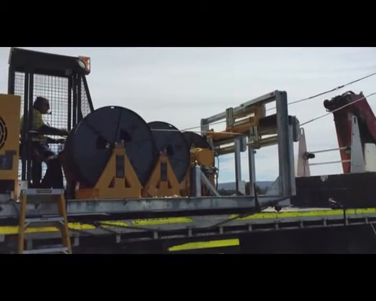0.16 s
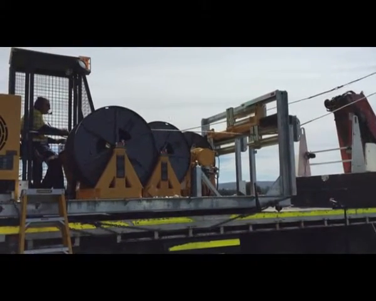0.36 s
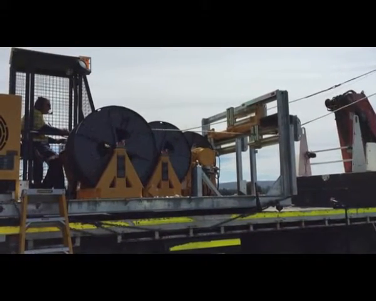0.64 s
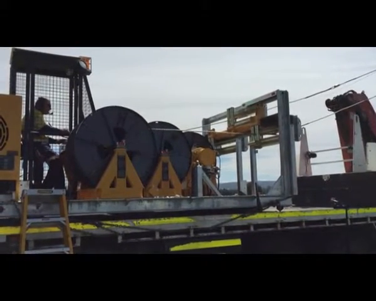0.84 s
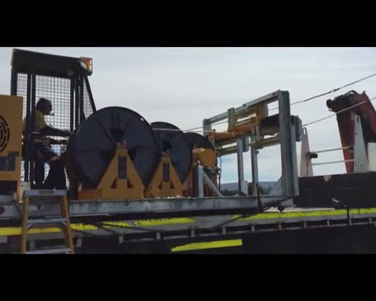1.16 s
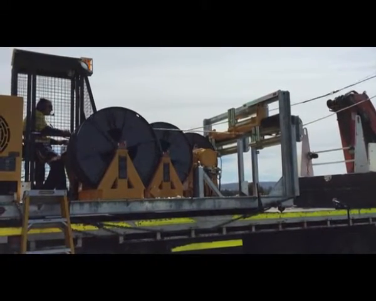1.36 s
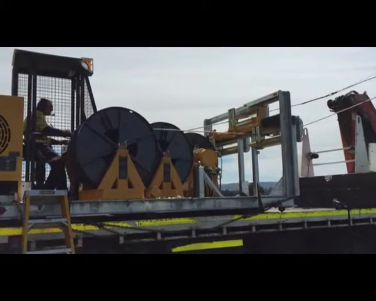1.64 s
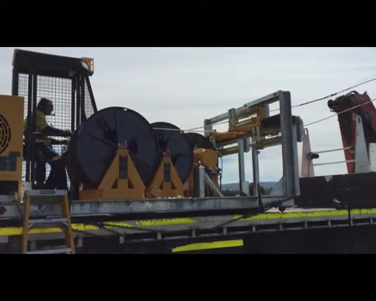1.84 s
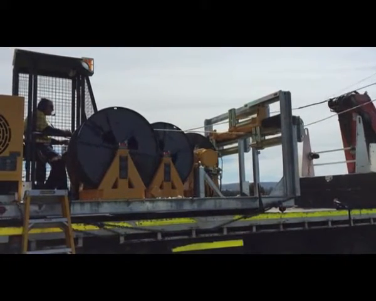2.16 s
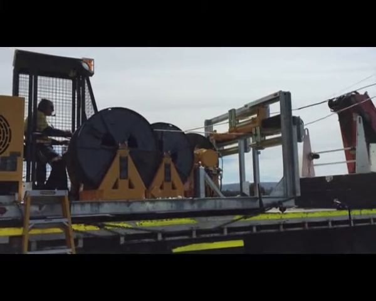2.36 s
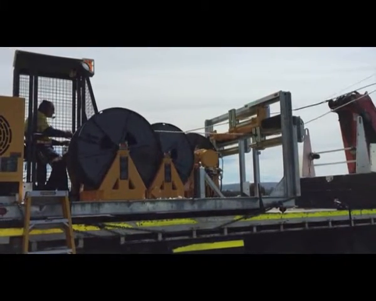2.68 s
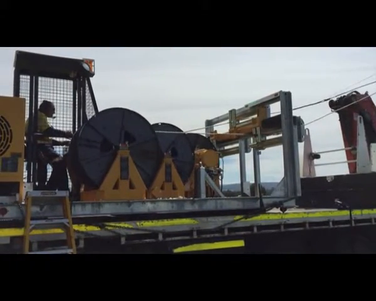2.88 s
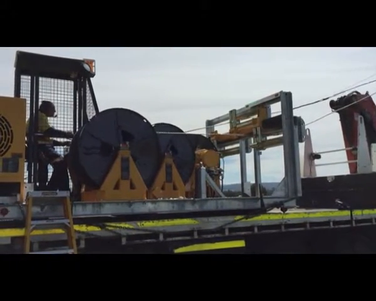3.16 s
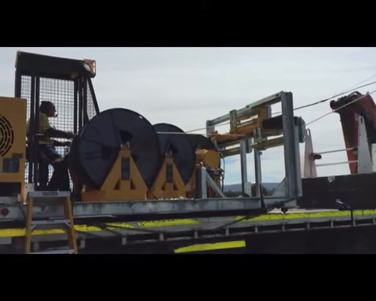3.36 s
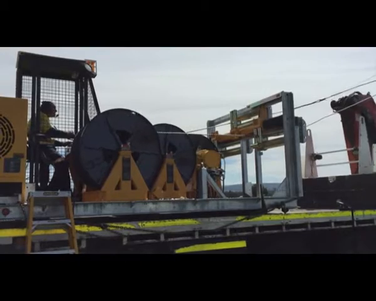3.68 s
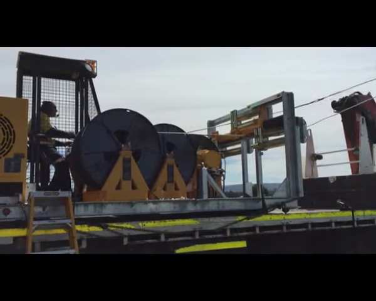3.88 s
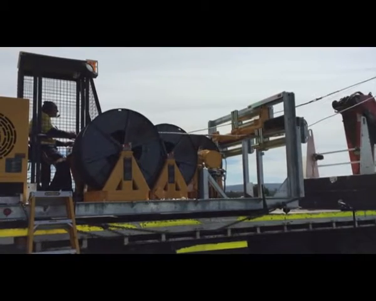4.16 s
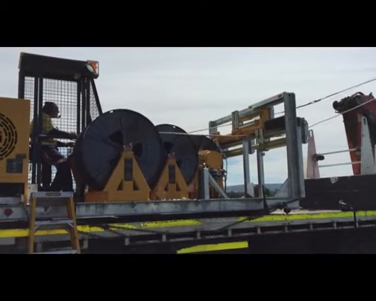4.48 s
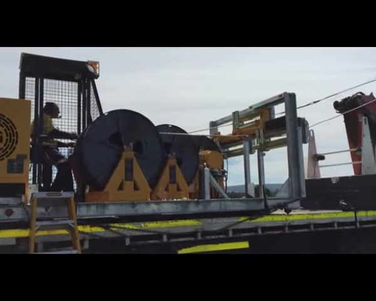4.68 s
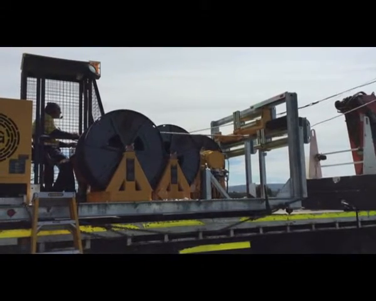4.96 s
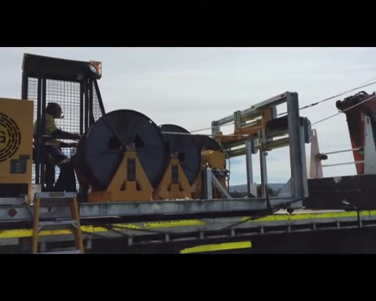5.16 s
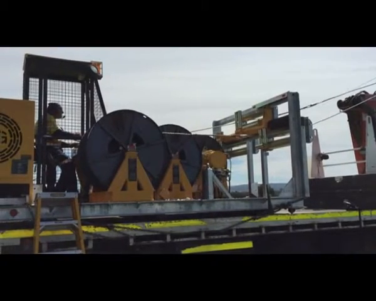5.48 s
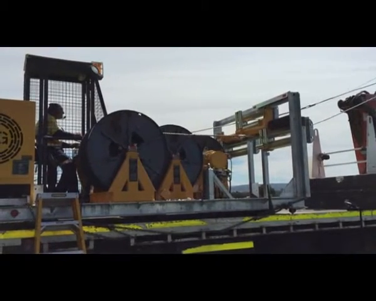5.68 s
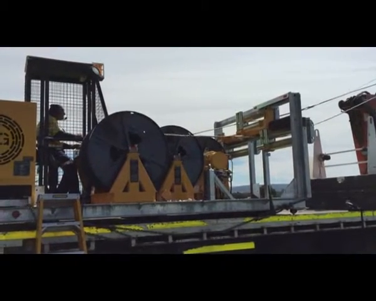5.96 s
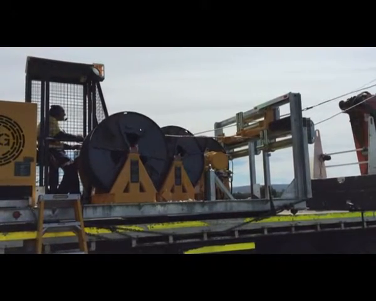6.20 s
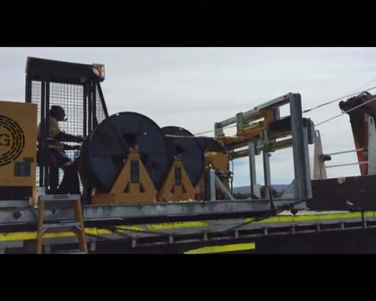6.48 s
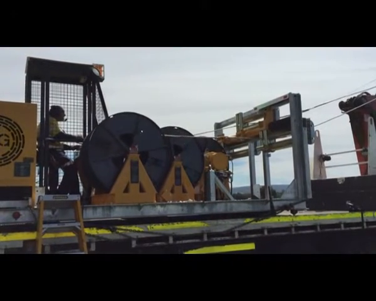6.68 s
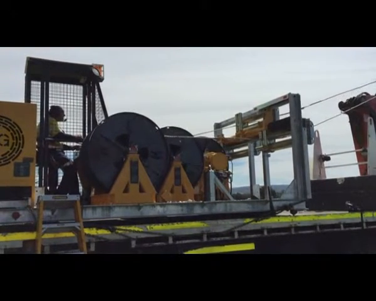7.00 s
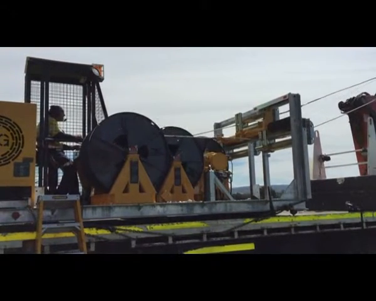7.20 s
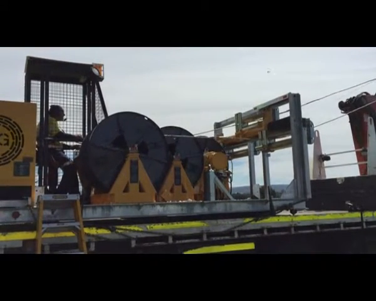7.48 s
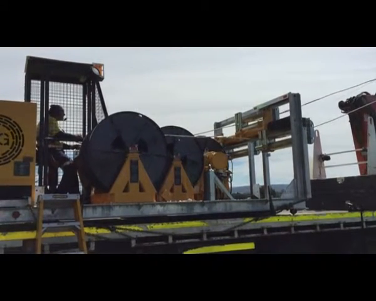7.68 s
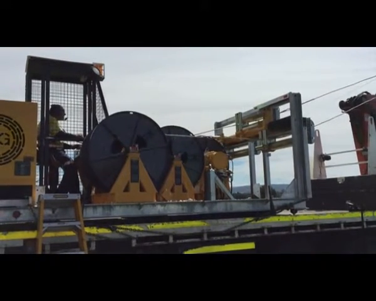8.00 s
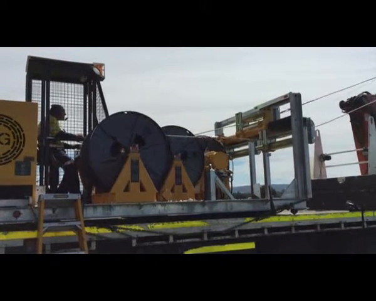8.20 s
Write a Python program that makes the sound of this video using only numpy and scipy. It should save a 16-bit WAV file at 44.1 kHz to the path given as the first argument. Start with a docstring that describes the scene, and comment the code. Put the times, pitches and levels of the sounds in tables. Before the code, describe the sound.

Steady diesel-driven cable winch on an open deck: low drone, metallic rattle, pump whine and oil hiss, with low wind thumps early on.

```python
"""A four-cylinder diesel drives the hydraulic pump of a cable winch on an open truck deck, at nearly steady speed.
Exhaust harmonics drone, each firing strikes the block's modes, and loose parts clatter as modulated resonances.
The nine-piston pump whines in tones locked to the crank; oil hisses as broad noise and narrow bands that surge.
A short faint groan, perhaps the cable in its sheave, is a rising tone. Wind is low noise with decaying thumps:
puffs on the microphone at the start and a light rumble near the end."""
import sys
import numpy as np
from scipy import signal
from scipy.fft import rfft, irfft
from scipy.io import wavfile

SR = 44100
rng = np.random.default_rng(int(sys.argv[2]) if len(sys.argv) > 2 else 0)


def put_to_file(sound):
    """Save the sound as 16-bit audio at rate SR, in the file named by the first command-line argument."""
    columns = np.atleast_2d(sound).T  # one column per channel
    safe = np.clip(columns, -1, 1)
    whole_steps = np.round(safe * 32767)
    wavfile.write(sys.argv[1], SR, whole_steps.astype(np.int16))


N = 367794
TIME = np.arange(N) / SR   # s


def from_db(db):
    """Logarithmic level: decibels to amplitude gain."""
    return 10 ** (np.asarray(db) / 20)


def rms_one(x):
    """Normalisation: scale to unit mean power."""
    return x / np.sqrt(np.mean(x ** 2) + 1e-20)


def in_time(rows):
    """Linear interpolation: each column of a curve at every sample."""
    seconds, *columns = np.transpose(rows)
    return [np.interp(TIME, seconds, column) for column in columns]


def envelope(start, hold, attack, release):
    """Linear growth toward 1; exponential decay sets in once the hold, counted from the start, is over."""
    age = TIME - start
    rise = np.clip(age / attack, 0, 1)
    fall = np.exp(-np.maximum(age - hold, 0) / release)
    return rise * fall


def drift(rate):
    """Low-passed random fluctuation: mostly slower than the rate in Hz, with unit rms."""
    hz = np.arange(N // 2 + 1) * SR / N
    lowpass = 1 / (1 + (hz / rate) ** 4)
    return rms_one(irfft(rfft(rng.standard_normal(N)) * lowpass, N))


def noise(spectrum):
    """Spectral shaping: noise of the given dB per Hz, falling steeply beyond both ends."""
    hz = np.maximum(np.arange(N // 2 + 1) * SR / N, 1)
    points, db = np.transpose(spectrum)
    skirts = np.minimum(1, np.minimum(hz / points[0], points[-1] / hz)) ** 12
    gain = from_db(np.interp(np.log(hz), np.log(points), db)) * skirts
    return irfft(rfft(rng.standard_normal(N)) * gain, N) * np.sqrt(SR / 2)


def ring(force, hz, width):
    """Double resonance: the envelope of a unit click's response swells to height 1 and dies away."""
    damping = np.pi * width / SR
    pole = np.exp(-damping + 2j * np.pi * hz / SR)
    response = signal.lfilter([1], [1, -2 * pole, pole ** 2], force + 1e-18)
    return np.e * damping * response.real


def narrow_noise(bands):
    """Random excitation of resonances: noise rings in each band at its own rms level."""
    return sum(from_db(db) * rms_one(ring(rng.standard_normal(N), hz, width))
               for hz, width, db in bands)


def clicks(times, sizes):
    """Impulsive excitation: single-sample blows at the given seconds."""
    samples = np.clip(np.round(times * SR).astype(int), 0, N - 1)
    return np.bincount(samples, sizes, N)


# engine speed: [t/s, crank speed/(r/min)]
ENGINE_SPEED = [(0, 1778), (0.7, 1772), (1.3, 1774), (1.7, 1775.5), (2.2, 1774), (3.1, 1774), (3.8, 1772.2),
                (4.7, 1772.2), (5.3, 1774.8), (5.9, 1772.6), (6.6, 1770.5), (7.2, 1774.5), (7.8, 1770.6),
                (8.34, 1779)]


def engine_cycles():
    """Phase as the integral of speed: a four-stroke cycle takes two revolutions."""
    rpm, = in_time(ENGINE_SPEED)
    return .01 + np.cumsum(rpm / 120) / SR


# exhaust harmonics: [multiple of the cycle rate, level before waver/dB rms]
EXHAUST_HARMONICS = [(4, -31), (8, -50.5), (12, -50), (13, -52.5), (16, -65), (17, -54), (21, -67),
                     (24, -53.5), (38, -60), (42, -57.5), (44, -51.5)]


def exhaust(cycles, waver_db):
    """Fourier synthesis: the silencer leaves a strong firing tone and weak overtones."""
    crest = cycles - .078   # all harmonics crest together at this share of the cycle
    out = np.zeros(N)
    for multiple, db in EXHAUST_HARMONICS:
        level = from_db(db + waver_db * drift(11.0))
        out += np.sqrt(2) * level * np.cos(2 * np.pi * multiple * crest)
    return out


# when each cylinder knocks: [share of the two-revolution cycle]
KNOCK_PHASES = [.0277, .2906, .5328, .7459]
# modes of block and covers: [f/Hz, width/Hz, nominal peak level/dB for cylinders 1, 2, 3, 4]
BLOCK_MODES = [(985.0, 109.0, -47.0, -35.0, -54.0, -54.0), (1058.0, 32.0, -40.0, -46.0, -41.0, -38.0),
               (1178.0, 42.0, -33.0, -42.0, -50.0, -54.0), (1208.0, 20.0, -33.0, -39.0, -39.0, -43.0),
               (1249.0, 42.0, -36.0, -54.0, -38.0, -54.0), (1315.0, 58.0, -51.0, -54.0, -43.0, -33.0),
               (1469.0, 62.0, -31.0, -54.0, -38.0, -27.0), (1509.0, 37.0, -37.0, -54.0, -31.0, -54.0),
               (1557.0, 29.0, -42.0, -47.0, -33.0, -38.0), (1725.0, 20.0, -52.0, -40.0, -54.0, -54.0),
               (1804.0, 57.0, -44.0, -33.0, -33.0, -33.0), (1845.0, 46.0, -54.0, -33.0, -42.0, -51.0),
               (2055.0, 110.0, -40.0, -37.0, -43.0, -33.0), (2104.0, 25.0, -40.0, -36.0, -37.0, -45.0),
               (2667.0, 94.0, -36.0, -54.0, -50.0, -42.0), (2778.0, 55.0, -54.0, -44.0, -38.0, -41.0),
               (2828.0, 86.0, -51.0, -45.0, -37.0, -54.0)]
# overall gain of the knock: [t/s, gain/dB]
KNOCK_GAIN = [(0, -1.2), (3.2, -1.1), (4.0, 0.1), (7.5, 0.06), (8.34, -1.2)]


def knock(cycles, jitter_s, uneven_db, mode_uneven_db):
    """Modal excitation: each cylinder strikes the block's modes in its own way, with random strength."""
    due = (np.arange(int(cycles[-1]) + 1)[:, None] + KNOCK_PHASES).ravel()
    due = due[due < cycles[-1]]
    cylinder = np.arange(len(due)) % len(KNOCK_PHASES)
    times = np.interp(due, cycles, TIME) + jitter_s * rng.standard_normal(len(due))
    force_db = uneven_db * rng.standard_normal(len(due))
    out = np.zeros(N)
    for hz, width, *cylinder_db in BLOCK_MODES:
        mode_db = mode_uneven_db * rng.standard_normal(len(due))
        blow_db = np.array(cylinder_db)[cylinder] + force_db + mode_db
        out += ring(clicks(times, from_db(blow_db)), hz, width)
    gain_db, = in_time(KNOCK_GAIN)
    return from_db(gain_db) * out


def shaking(cycles, depth, length, cylinder_db):
    """Periodic amplitude modulation: a brief swell after every firing, at unit mean power."""
    age = (cycles - np.array(KNOCK_PHASES)[:, None]) % 1 / length   # length: share of a cycle
    swells = age * np.exp(1 - age)
    return rms_one(1 + depth * from_db(cylinder_db) @ swells)


# loose clatter of gears and sump: [f/Hz, width/Hz, level/dB rms]
CLATTER_MODES = [(1028, 187, -40.5), (1183, 43, -42.5), (1305, 99, -40.5), (1494.3, 61, -34.5),
                 (1796, 143, -37), (2010, 50, -44), (2164, 300, -44.5)]


def clatter(cycles):
    """Modulated resonant noise: every firing shakes the loose parts."""
    return narrow_noise(CLATTER_MODES) * shaking(cycles, depth=0.34, length=0.11,
                                                 cylinder_db=[2, -14.0, -1.5, -5.5])


# rocker cover resonances: [f/Hz, width/Hz, level/dB rms]
ROCKER_MODES = [(2661, 137, -42.5), (2777, 87, -45), (2853, 22, -49)]


def rocker_buzz(cycles):
    """Modulated resonant noise: the cover buzzes strongly after each firing, .02 cycle late."""
    return narrow_noise(ROCKER_MODES) * shaking(cycles - .02, depth=2.1, length=0.046,
                                                cylinder_db=[-3.5, -11.0, -15, -5.5])


# thin high engine tones: [multiple of the cycle rate, level before waver/dB rms]
ENGINE_TONES = [(79, -45.5), (107, -48.5), (116, -47), (144, -62), (188, -51), (192, -52.5), (195, -55.5)]


def engine_tones(cycles, waver_db):
    """Fourier synthesis: thin high tones at multiples of the cycle rate, locked to the crank."""
    out = np.zeros(N)
    for multiple, db in ENGINE_TONES:
        level = from_db(db + waver_db * drift(2.8))
        out += np.sqrt(2) * level * np.sin(2 * np.pi * multiple * cycles)
    return out


# unsteady hum of the cooling fan: [f/Hz, width/Hz, level/dB rms]
FAN_HUM = [(624.6, 11.5, -49.5)]
# dull noise of fan and frame: [f/Hz, spectral level/dB per Hz]
FRAME_RUMBLE = [(10, -77), (30, -67), (55, -69), (100, -72), (150, -72), (200, -67), (250, -58), (310, -74),
                (390, -77), (460, -71), (530, -59), (580, -69.5), (630, -65), (710, -75), (790, -65.5),
                (850, -79)]


def fan_and_frame():
    """Broadband radiation with one narrow resonance: dull noise and an unsteady fan hum."""
    return noise(FRAME_RUMBLE) + narrow_noise(FAN_HUM)


# pump tones: [multiple of the piston rate, level before swell and waver/dB rms]
PUMP_TONES = [(1, -35.5), (2, -36.5), (3, -51)]
# slow swell of the pump: [t/s, hum gain/dB, overtone gain/dB]
PUMP_SWELL = [(0.0, -1.7, -0.5), (0.6, 1.2, 0.4), (1.95, -0.8, 2.5), (2.25, -1.6, -1.5), (3.3, -2.8, 1),
              (3.75, 0.8, -1.5), (4.2, -0.7, -1.5), (4.5, -0.7, 0.8), (5.4, -0.6, -1), (5.55, -0.4, 1.5),
              (6.45, 2.0, -1.2), (7.05, 1.1, 0.5), (7.5, 2, -4), (8.34, -1.2, 1.5)]


def pump(cycles, cycle_ripple, turn_ripple, waver_db):
    """Phase modulation: nine pistons pulse per revolution; uneven turning gives the whine side tones."""
    angle = 2 * np.pi * 18 * cycles   # nine strokes in each of two revolutions
    angle += cycle_ripple * np.sin(2 * np.pi * cycles)   # ripples in radians
    angle += turn_ripple * np.sin(2 * np.pi * 2 * cycles)
    tones = []
    for multiple, db in PUMP_TONES:
        level = from_db(db + waver_db * drift(4.8))
        tones.append(np.sqrt(2) * level * np.cos(multiple * angle))
    hum, *overtones = tones
    hum_db, overtone_db = in_time(PUMP_SWELL)
    return from_db(hum_db) * hum + from_db(overtone_db) * sum(overtones)


# oil hiss before the flow gain: [f/Hz, spectral level/dB per Hz]
HISS_SPECTRUM = [(3200, -108), (4500, -119.5), (5100, -82.5), (5500, -67), (5850, -68.5), (6050, -76),
                 (6500, -70.5), (6900, -77), (7500, -69), (8200, -90), (9000, -86), (9900, -87.5)]
# narrow bands of noise in the hiss, before the flow gain: [f/Hz, width/Hz, level/dB rms]
HISS_BANDS = [(3450, 110, -57), (3469, 57, -50.5), (4004, 42, -72), (4206, 31, -57.5), (4505, 55, -63.5),
              (4877, 46, -52), (5887, 60, -45), (6487, 28, -49), (6930, 87, -52.5), (7960, 84, -49),
              (8420, 330, -53), (8870, 58, -55.5), (9350, 120, -57)]
# brief surges: [start t/s, hold/s, nominal rise/dB]
HISS_SURGES = [(1.0, 0.23, 2), (1.58, 0.093, 2.2), (2.0, 0.067, 3), (2.86, 0.12, 3.0), (3.297, 0.2, 2.2),
               (4.44, 0.052, 4), (4.926, 0.04, 6), (7.36, 0.065, 6), (8.04, 0.36, 1.5)]
SURGE_ATTACK_S, SURGE_RELEASE_S = 0.1, 0.026
FLOW_DB, FLOW_WANDER_DB, FLOW_WANDER_HZ = -1.25, 1, 2.2


def oil_hiss(cycles):
    """Flow noise: hiss of broad noise and narrow bands, wandering, surging and pulsing with the firings."""
    surge_db = sum(db * envelope(start, hold, SURGE_ATTACK_S, SURGE_RELEASE_S)
                   for start, hold, db in HISS_SURGES)
    flow_db = FLOW_DB + surge_db + FLOW_WANDER_DB * drift(FLOW_WANDER_HZ)
    flow = from_db(flow_db) * (noise(HISS_SPECTRUM) + narrow_noise(HISS_BANDS))
    pulse = shaking(cycles, depth=0.12, length=0.034, cylinder_db=[-6.0, -6.5, 7.5, 8.0])
    flicker = from_db(0.89 * drift(47))
    return flow * pulse * flicker


GROAN_START_S, GROAN_HOLD_S, GROAN_ATTACK_S, GROAN_RELEASE_S = 5.17, .12, .03, 0.02
GROAN_HZ, GROAN_RISE_HZ_PER_S, GROAN_DB = 630, 180, -37.5   # starting pitch, glide, rms while held


def groan():
    """Frequency glide: a pure tone, perhaps the cable in its sheave, rises while it is held."""
    hz = GROAN_HZ + GROAN_RISE_HZ_PER_S * np.clip(TIME - GROAN_START_S, 0, GROAN_HOLD_S)
    swell = envelope(GROAN_START_S, GROAN_HOLD_S, GROAN_ATTACK_S, GROAN_RELEASE_S)
    tone = np.sin(2 * np.pi * np.cumsum(hz) / SR)
    return np.sqrt(2) * from_db(GROAN_DB) * swell * tone


# relative wind spectrum: [f/Hz, relative spectral level/dB]
WIND_SPECTRUM = [(20, -12), (45, -4), (75, 9), (115, 2), (160, -1.5), (230, -7), (330, -26.5)]
# gusts on the microphone: [start t/s, hold/s, level before lumps/dB rms]
WIND_GUSTS = [(-.03, 0.34, -28.5), (0.49, 0.67, -34), (1.35, 0.17, -38), (2.9, .3, -42), (6.7, 2.1, -36.5),
              (7.027, .13, -33)]
# sudden low thumps: [t/s, nominal peak level/dB, f/Hz]
WIND_THUMPS = [(0.019, -21.5, 123), (0.0428, -11, 103), (.062, -14, 70.6), (.196, -19, 90.5),
               (.526, -20.5, 146), (0.598, -18, 94), (.788, -19, 171), (.828, -25, 127), (1.035, -31, 202),
               (7.121, -20, 112)]
GUST_ATTACK_S, GUST_RELEASE_S = 0.028, 0.12
LUMPS_DB, LUMPS_HZ = 2, 9.9   # turbulence
BREEZE_DB = -50.0   # light air between gusts, rms before lumps
THUMP_WIDTH_HZ = 44


def wind():
    """Addition of powers: gusts rise from a breeze as lumpy low noise; thumps are damped oscillations."""
    gust_power = sum((from_db(db) * envelope(start, hold, GUST_ATTACK_S, GUST_RELEASE_S)) ** 2
                     for start, hold, db in WIND_GUSTS)
    lumps = from_db(LUMPS_DB * drift(LUMPS_HZ))
    strength = np.sqrt(from_db(BREEZE_DB) ** 2 + gust_power) * lumps
    thumps = sum(ring(clicks(np.array([start]), [from_db(db)]), hz, THUMP_WIDTH_HZ)
                 for start, db, hz in WIND_THUMPS)
    return strength * rms_one(noise(WIND_SPECTRUM)) + thumps


def scene():
    """Superposition: one crankshaft times the drone, knock, clatter, whine and the pulsing of the hiss."""
    cycles = engine_cycles()
    engine = exhaust(cycles, waver_db=1.6)
    engine += knock(cycles, jitter_s=.00003, uneven_db=2.06, mode_uneven_db=2.0)
    engine += clatter(cycles) + rocker_buzz(cycles)
    engine += engine_tones(cycles, waver_db=1.0) + fan_and_frame()
    whine = pump(cycles, cycle_ripple=0.096, turn_ripple=0.052, waver_db=0.5)
    hydraulics = whine + oil_hiss(cycles)
    return (engine + hydraulics + groan() + wind())[None]


CUTOFF_HZ = 9950


def record(dry):
    """Elliptic low-pass filtering: the top is cut steeply."""
    lowpass = signal.ellip(12, .1, 80, CUTOFF_HZ, fs=SR, output="sos")   # ripple and stopband in dB
    return signal.sosfilt(lowpass, dry)


dry = scene()
out = record(dry)
put_to_file(out)
```